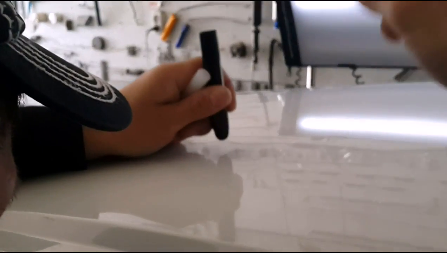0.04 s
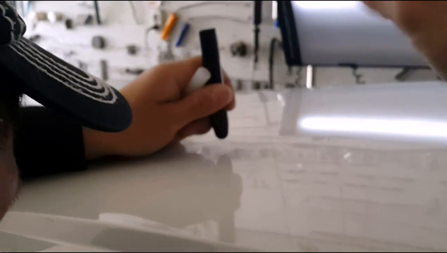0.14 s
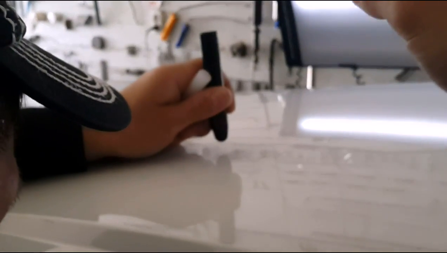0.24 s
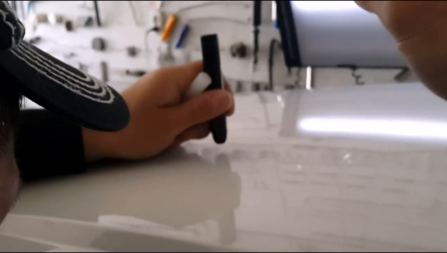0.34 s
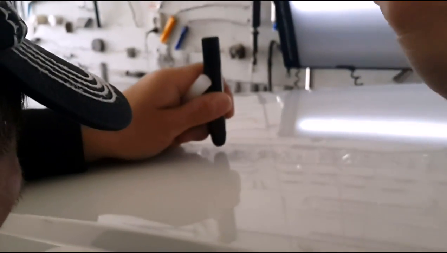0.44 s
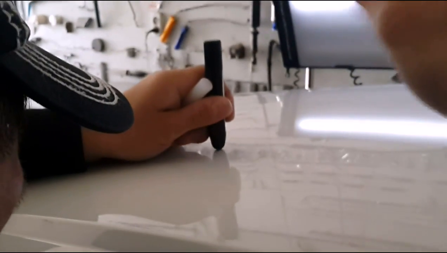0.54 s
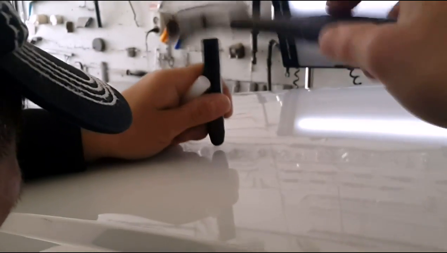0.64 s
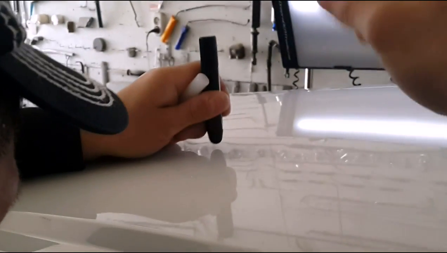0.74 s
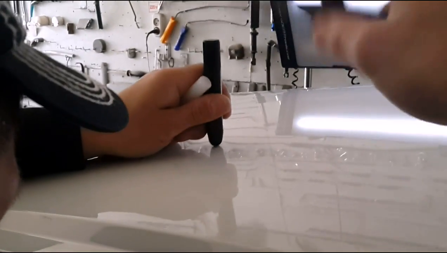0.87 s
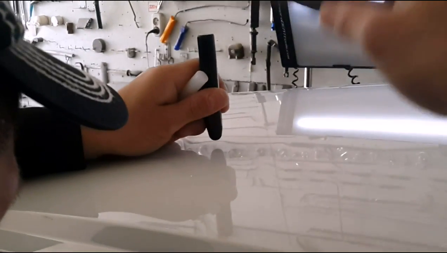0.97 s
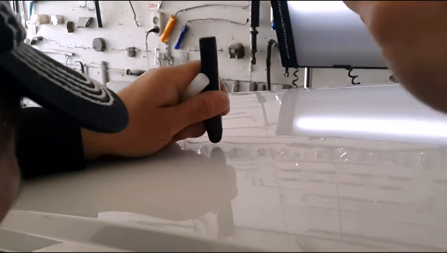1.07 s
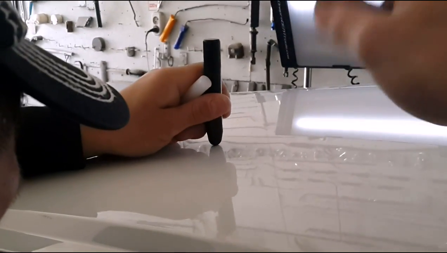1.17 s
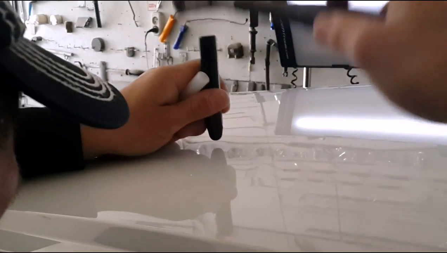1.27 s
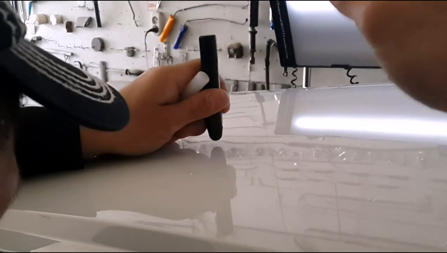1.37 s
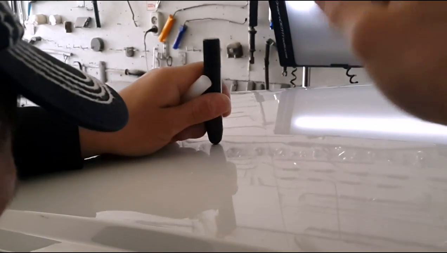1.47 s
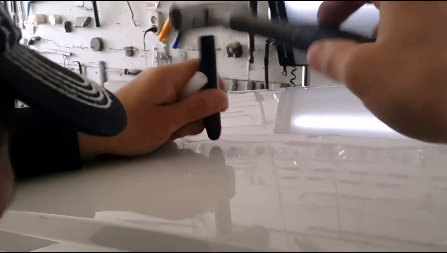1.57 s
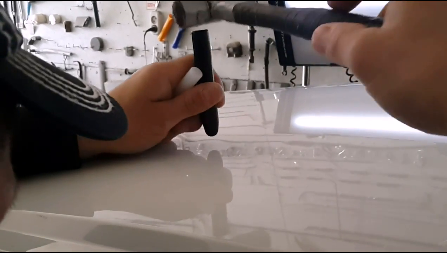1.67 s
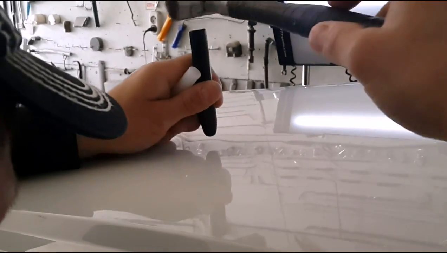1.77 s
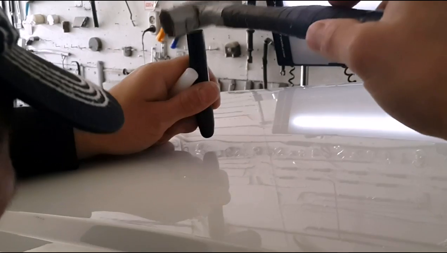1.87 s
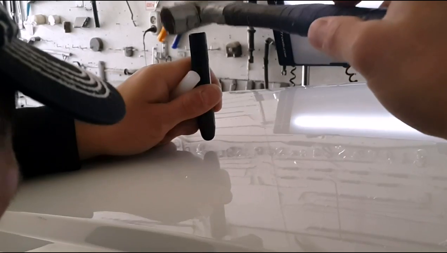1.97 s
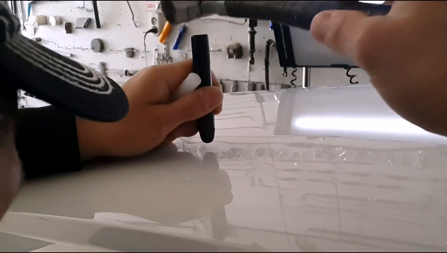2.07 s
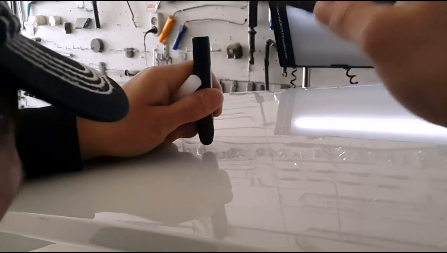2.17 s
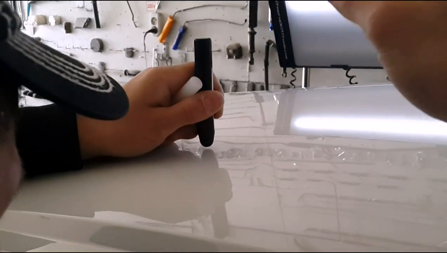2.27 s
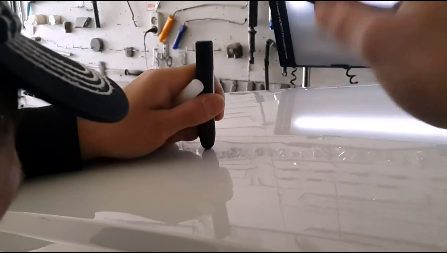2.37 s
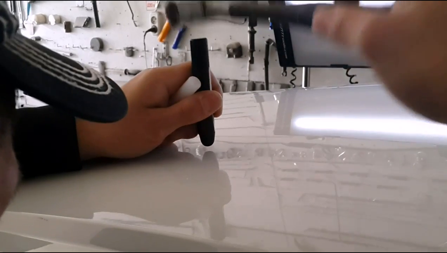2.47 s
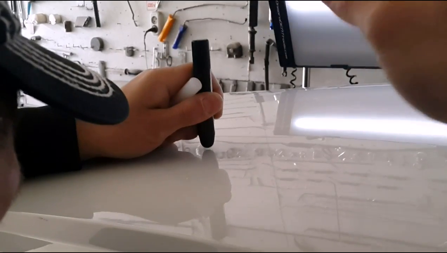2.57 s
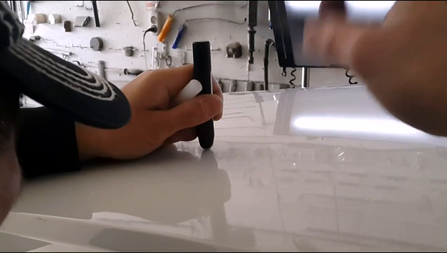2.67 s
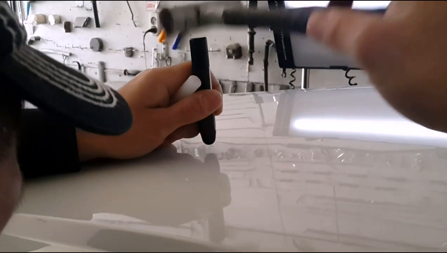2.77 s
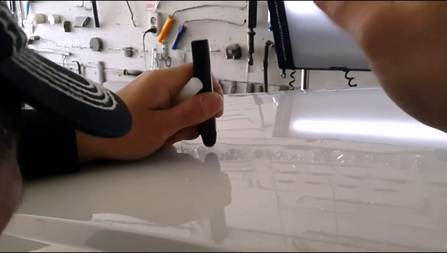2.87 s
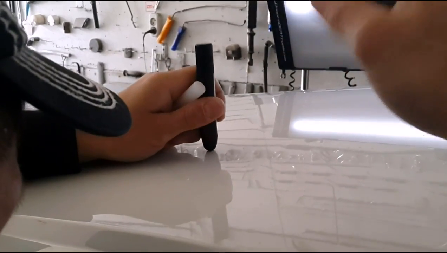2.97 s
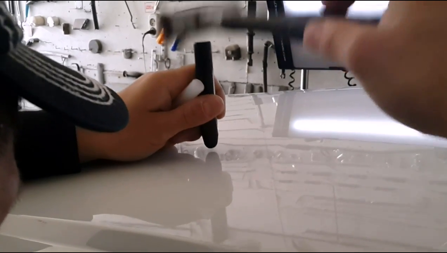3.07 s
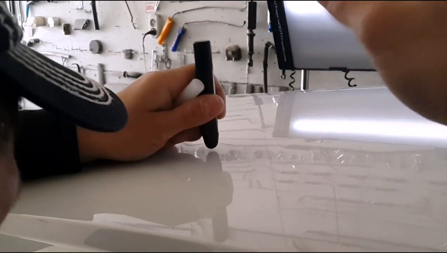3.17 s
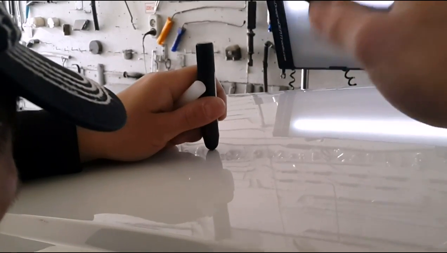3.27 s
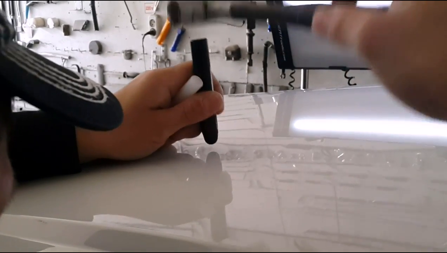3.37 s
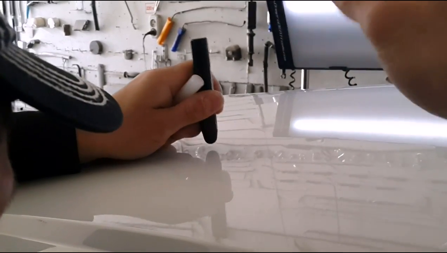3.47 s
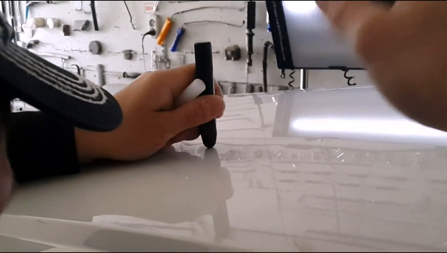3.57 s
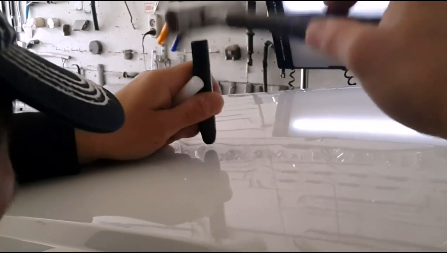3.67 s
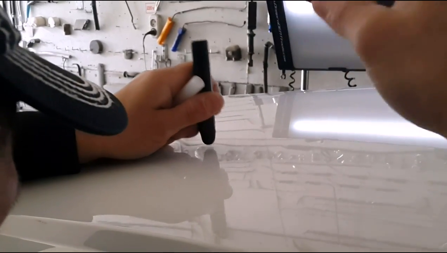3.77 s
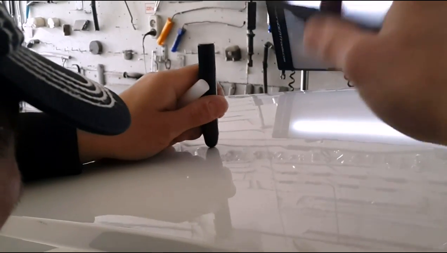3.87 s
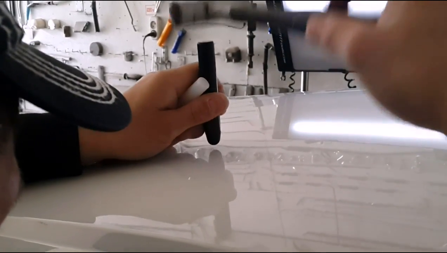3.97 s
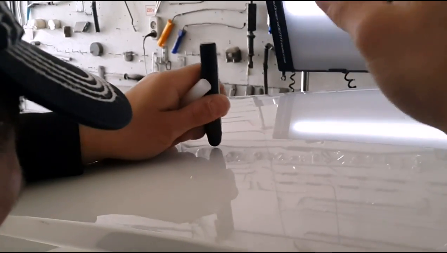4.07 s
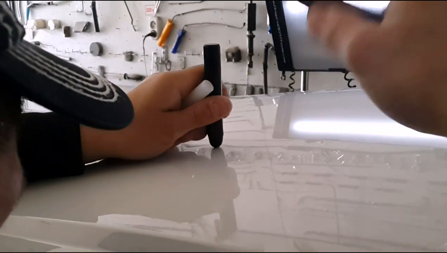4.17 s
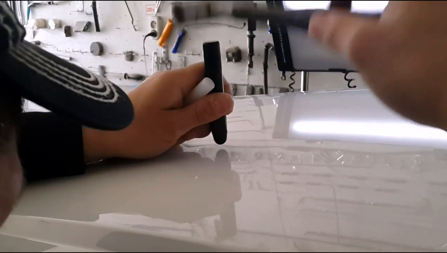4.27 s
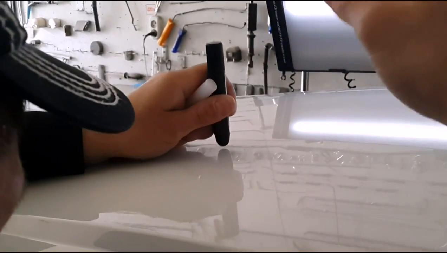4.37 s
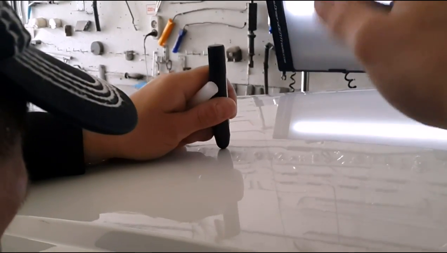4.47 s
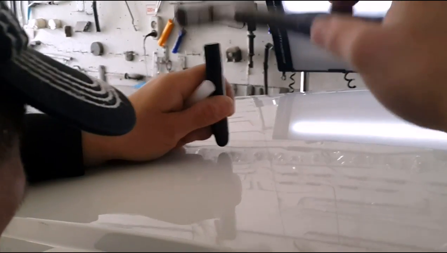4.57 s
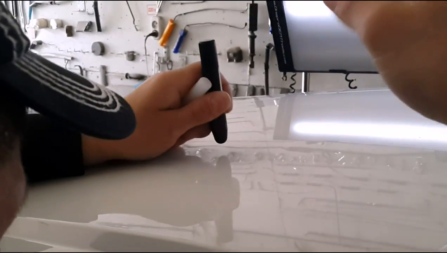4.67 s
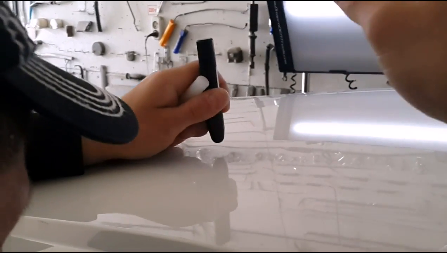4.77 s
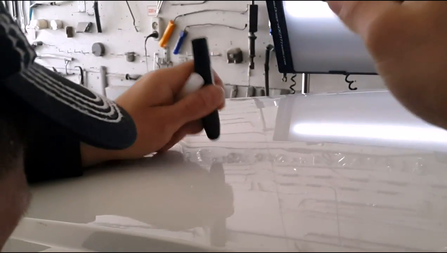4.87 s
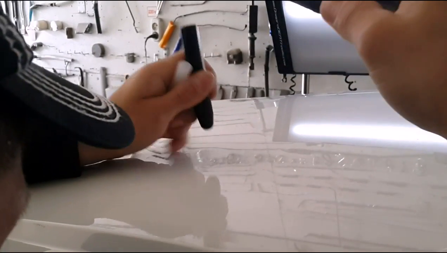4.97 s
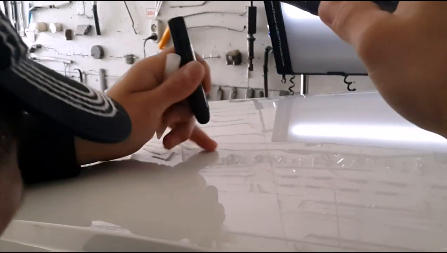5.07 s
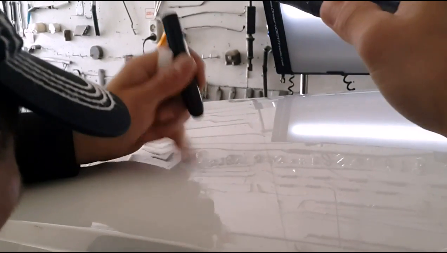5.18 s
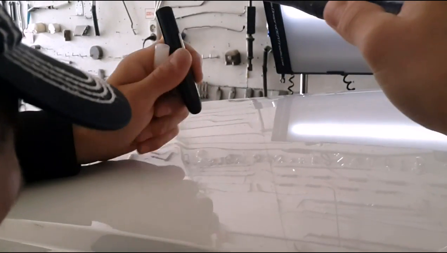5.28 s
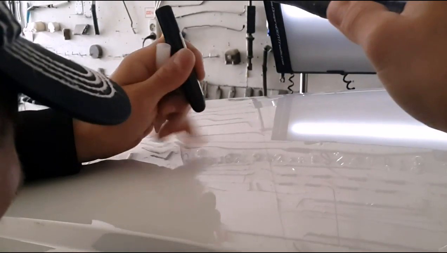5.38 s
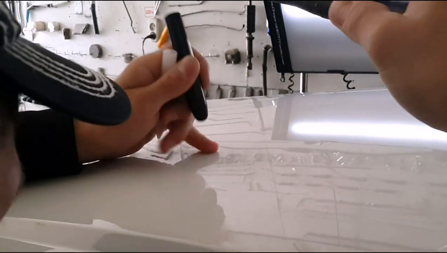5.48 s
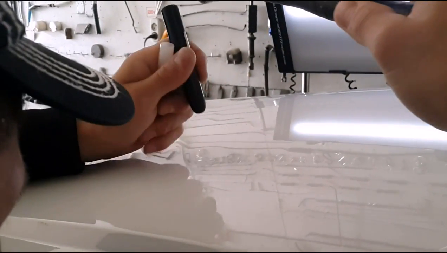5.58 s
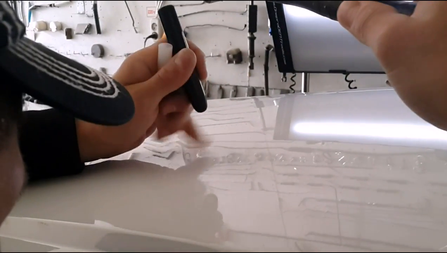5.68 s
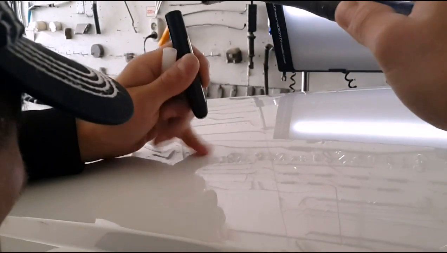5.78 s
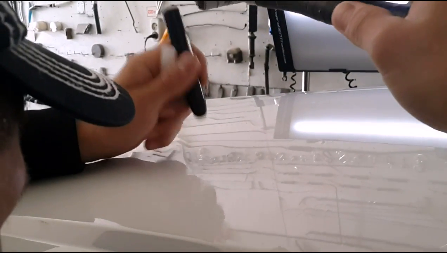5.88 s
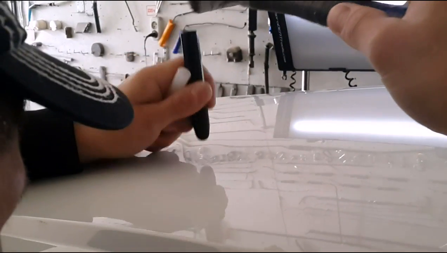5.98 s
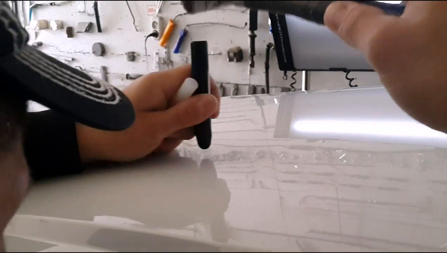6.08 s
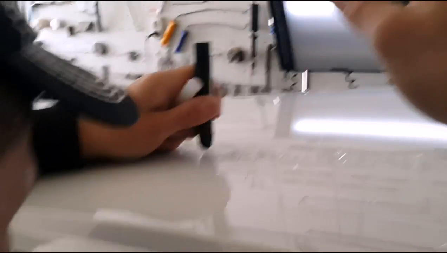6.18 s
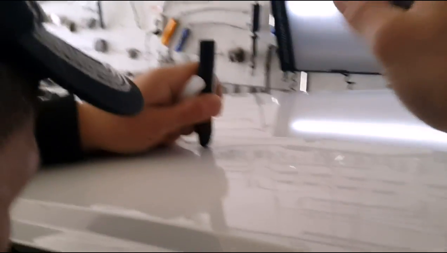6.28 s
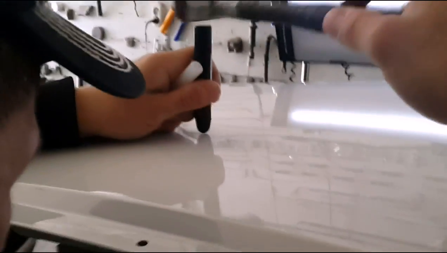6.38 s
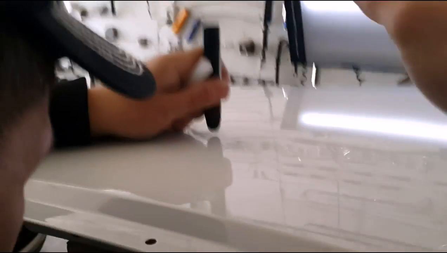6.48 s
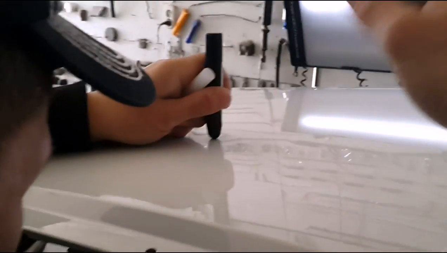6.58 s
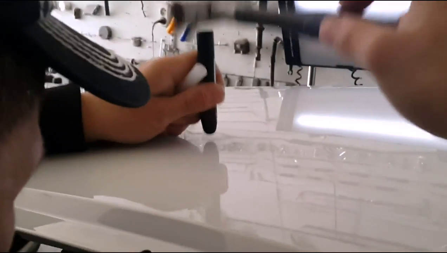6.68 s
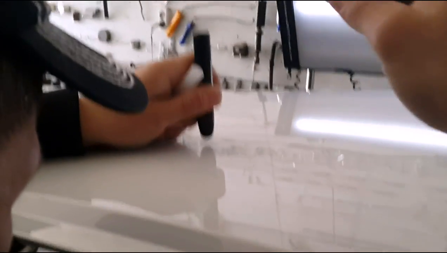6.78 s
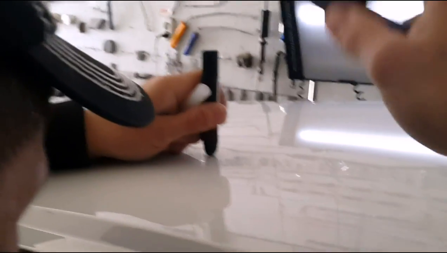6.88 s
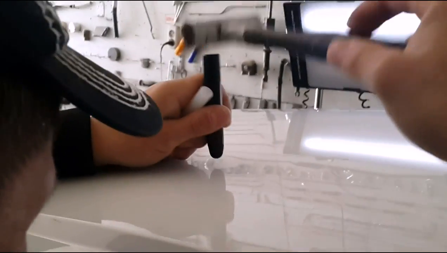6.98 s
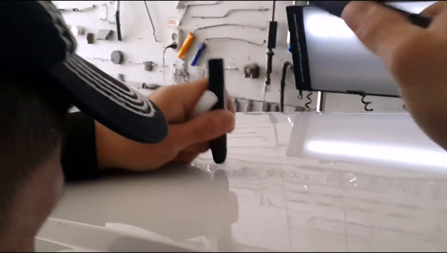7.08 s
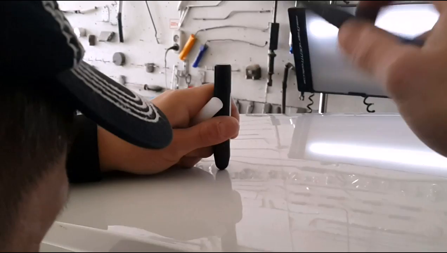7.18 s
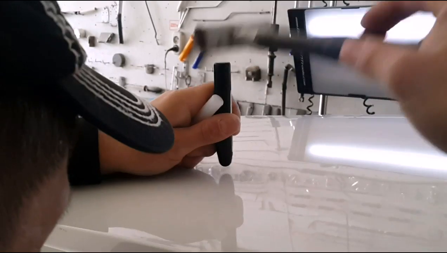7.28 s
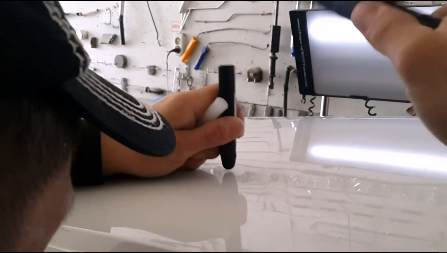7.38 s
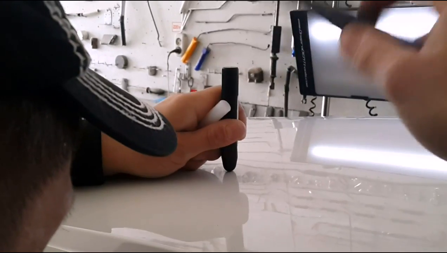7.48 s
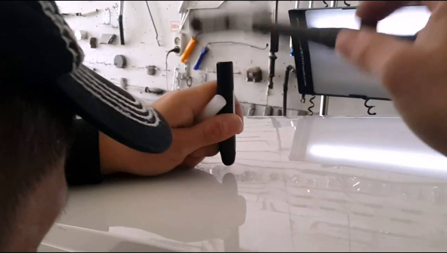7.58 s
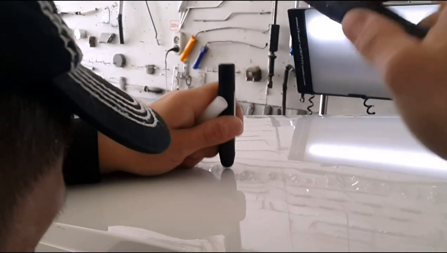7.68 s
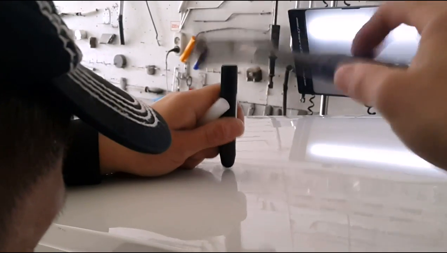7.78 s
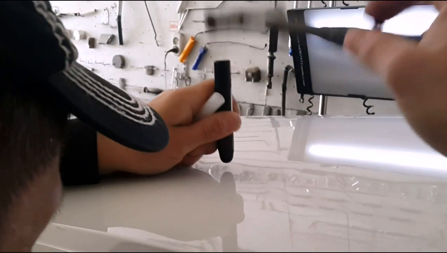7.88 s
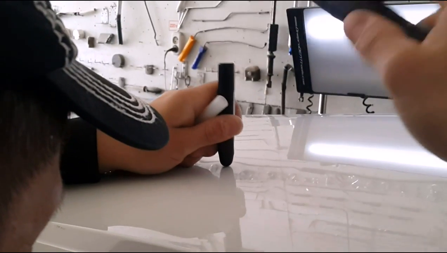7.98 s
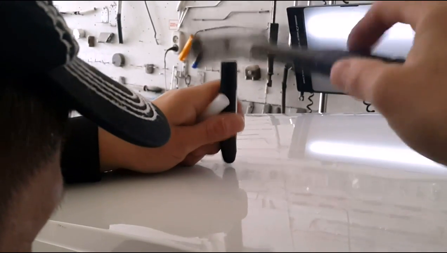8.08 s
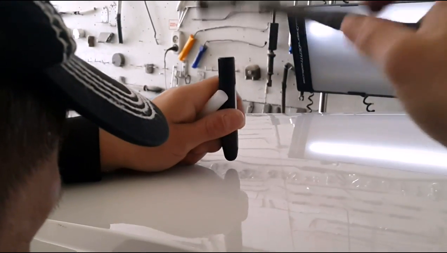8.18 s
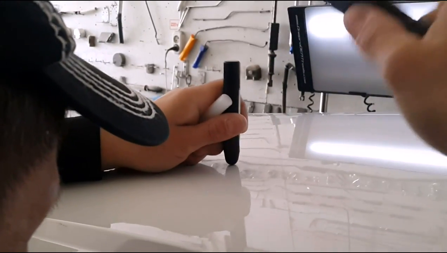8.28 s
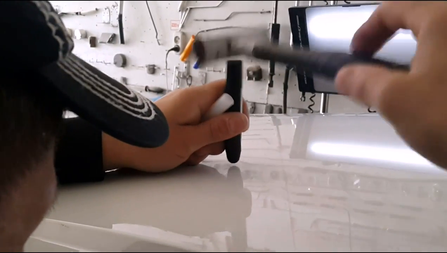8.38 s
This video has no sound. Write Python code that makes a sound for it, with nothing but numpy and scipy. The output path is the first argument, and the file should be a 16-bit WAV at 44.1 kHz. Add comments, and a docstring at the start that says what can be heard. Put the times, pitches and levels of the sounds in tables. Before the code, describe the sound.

The faint end of an earlier panel ring opens over quiet shop air. A lone hammer blow on a punch lands at 0.1 s: bright steel click, short knock, hollow sheet-metal boom and dense short room wash. Four even blows follow from 0.8 to 1.7 s, then a pause. Eight more run from 2.6 to 4.7 s, about 0.3 s apart, some crisp, others duller and glancing. Light tip ticks precede blows by under a tenth of a second. From about 5.4 s the background of airy noise and faint machine tones rises; soft low finger thuds come at 5.6 and 5.95 s, and a tiny click near 6.46 s. The hardest, dull blow hits at 6.5 s and the background drops. Six further taps, mostly crisp and somewhat lighter, continue to 8.3 s. Close stereo sound, hard walls, leaning slightly right.

```python
"""A small hammer taps a hand-held punch on a car body panel: a lone blow, then three runs, in a hard-walled workshop.
Each blow is a short contact (click, crack, punch ring) plus the sheet's sine modes and a noise wash for the room.
Just before each blow the punch tip is set down with a light tick; in the long pause a finger presses on the panel.
The shop adds filtered air noise and faint machine tones, which rise when a long quiet lets the gain climb."""
import sys
import numpy as np
from scipy import signal
from scipy.fft import rfft, irfft, next_fast_len
from scipy.io import wavfile
from scipy.ndimage import uniform_filter1d, map_coordinates

SR = 44100
rng = np.random.default_rng(int(sys.argv[2]) if len(sys.argv) > 2 else 0)


def digitize_waveform(pressure):
    """Quantize a signal to 16-bit integers and store it at the path in sys.argv[1].

    Rows of a 2-D input are taken as channels; values are limited to [-1, 1].
    """
    field = np.atleast_2d(pressure).T
    bounded = np.clip(field, -1, 1)
    quanta = np.round(bounded * 32767).astype(np.int16)
    wavfile.write(sys.argv[1], SR, quanta)


N = 372204
RING_S = np.arange(int(.8 * SR)) / SR  # time axis of every struck sound


def amp(db):
    """Decibels to gain."""
    return 10 ** (np.asarray(db) / 20)


def unit(x):
    """Scale to rms 1."""
    return x / np.sqrt(np.mean(x ** 2) + 1e-20)


def burst(x):
    """Scale a struck sound to the energy of 120 ms at rms 1."""
    energy = np.mean(np.sum(x ** 2, -1))
    return x / np.sqrt(energy / (.12 * SR))


def along(points, hz):
    """Read (Hz, value) points on a log frequency axis."""
    f, v = np.transpose(points)
    return np.interp(np.log(hz + 1), np.log(f), v)


def filtered(x, gain):
    """Multiply the spectrum of x by a gain that depends on frequency."""
    m = next_fast_len(x.shape[-1] + 8192)
    spectrum = rfft(x, m) * gain(np.fft.rfftfreq(m, 1 / SR))
    return irfft(spectrum, m)[..., :x.shape[-1]]


def coloured(x, points, size=4096):
    """Causal (minimum-phase) colour from (Hz, dB) points: nothing sounds ahead of a blow."""
    cepstrum = irfft(np.log(amp(along(points, np.fft.rfftfreq(size, 1 / SR)))))
    # fold the cepstrum forward in time
    cepstrum[1:size // 2] *= 2
    cepstrum[size // 2 + 1:] = 0
    response = irfft(np.exp(rfft(cepstrum)))
    return signal.fftconvolve(x, response[None], axes=1)[:, :x.shape[-1]]


def add(track, s, sound):
    """Mix a sound in at time s, in seconds."""
    start = max(round(s * SR), 0)
    part = track[:, start:start + sound.shape[1]]
    part += sound[:, :part.shape[1]]


# Stereo spread. Each row: frequency in Hz, side over mid in dB.
STEREO_WIDTH = [(60, -13), (130, -11), (300, -11), (550, -7), (900, -1), (2000, -1), (5000, 1), (12000, 0)]


def diffuse(count):
    """Flat stereo noise, alike at both ears in the bass and unrelated in the treble."""
    def mid_side_gain(hz):
        side_over_mid = amp(along(STEREO_WIDTH, hz))
        return np.array([np.ones_like(hz), side_over_mid]) / np.hypot(1, side_over_mid)

    mid, side = filtered(rng.standard_normal((2, count)), mid_side_gain)
    return np.array([mid + side, mid - side])


def fade(t60, hold, late_db=-20, late_ratio=2.24):
    """The level holds for a moment before it falls; a fainter, slower tail lingers."""
    early = amp(-60 * (np.hypot(RING_S, hold) - abs(hold)) / t60)
    late = amp(late_db - 60 * RING_S / (late_ratio * t60))
    return np.hypot(early, late)


# How fast panel and room die away at first. Each row: frequency in Hz, time to fall 60 dB in seconds.
DECAY_TIMES = [(80, 0.3), (220, 0.34), (370, 0.34), (650, 0.29), (1500, 0.31), (4000, 0.36), (8000, 0.32),
               (14000, 0.23)]
# Tone of the dense upper panel modes mixed by the room. Each row: frequency in Hz, relative density in dB per Hz.
WASH_TONE = [(30, -28.5), (54, -28), (70, -8), (82, -10), (98, -14), (145, -5.5), (300, -8.5), (450, -1.5),
             (620, -0.5), (850, -4.5), (1450, -6), (1850, -11.5), (2400, -10), (2800, -15), (4000, -16),
             (5600, -19.5), (7200, -21), (12500, -30), (16000, -43.5)]


def wash(hold, patchy_db=1.0, size=160):
    """Countless modes and reflections as noise, each band dying at its own speed."""
    noise = diffuse(len(RING_S))
    centres, t60s = np.transpose(DECAY_TIMES)
    tail = np.zeros_like(noise)
    for weights, t60 in zip(np.eye(len(DECAY_TIMES)), t60s):
        band = filtered(noise, lambda hz: along(np.c_[centres, weights], hz))
        tail += band * fade(t60, hold)
    spectrum, hz = rfft(tail, 2 * len(RING_S)), np.fft.rfftfreq(2 * len(RING_S), 1 / SR)
    # the low modes share the energy evenly; the high ones bunch into clusters
    power = np.mean(np.abs(spectrum) ** 2, 0)
    broad = np.sqrt(np.abs(uniform_filter1d(power, size)))
    clusters = unit(uniform_filter1d(rng.standard_normal(len(hz)), size)) * along([(1200, 0), (2000, 1)], hz)
    flat = irfft(spectrum * amp(patchy_db * clusters) / broad)[:, :len(RING_S)]
    return burst(coloured(flat, WASH_TONE))


# Strong low modes of the panel. Each row: frequency in Hz, level in dB before the tilt, build-up time in seconds.
PANEL_MODES = [(124, -9, .008), (149, -9, .008), (206, -1.5, .015), (222, -7, .01), (249, -5.5, .005),
               (264, -6, .012), (282, -8, .01), (330, -1, .03), (355, -1.5, .03), (381, -4.5, .04),
               (392, -6.5, .04), (419, -8, .02), (470, -8, .02), (493, -7, .015), (511, -6, .005),
               (554, -2, .01), (581, -7, .01), (619, -5, .02), (647, -3.5, .03), (682, -8, .008),
               (730, -7, .004), (887, -8, .005), (960, -8, .004), (1055, -6, .003), (1179, -11, .008),
               (1241, -10, .008), (1418, -8, .004), (1506, -12, .005), (1642, -13, .004), (2166, -14, .004)]


def sheet(hold, tilt_db=-5.5, waver=1.0, waver_rate=28):
    """The strong low modes of the panel as sines; reflections make each one waver."""
    ring = np.zeros((2, len(RING_S)))
    for hz, db, swell in PANEL_MODES:
        # smooth random curves from waver_rate points per second
        drift, ripple = [map_coordinates(knots, [RING_S * waver_rate], mode="mirror")
                         for knots in rng.standard_normal((2, 64))]
        # opposite phase shifts at the two ears widen the mode
        spread = np.arctan(amp(along(STEREO_WIDTH, hz))) * rng.choice([-1, 1]) * np.array([[1], [-1]])
        phase = 2 * np.pi * (hz * RING_S + rng.random()) + spread
        mode = (1 + waver * ripple) * np.sin(phase) + waver * drift * np.cos(phase)
        # the hollow modes near 350 Hz bloom a moment after the blow
        shape = fade(along(DECAY_TIMES, hz), hold) * (1 - np.exp(-RING_S / swell))
        ring += amp(db + tilt_db * np.log10(hz)) * burst(mode * shape)  # tilt in dB per decade
    return burst(ring)


def last_ring(body, ring, age=.215, level_db=-21):
    """The panel is still ringing from an earlier blow, so only the late part of its answer sounds."""
    out = np.zeros((2, N))
    add(out, 0, amp(level_db) * (body + amp(-2) * ring)[:, round(age * SR):])
    return out


# Tone of the shop air. Each row: frequency in Hz, relative density in dB per Hz.
AIR_TONE = [(30, -26.5), (70, -24.5), (98, -13), (122, -2.5), (250, -13), (400, -11.5), (650, -5),
            (1000, -11), (2000, -10.5), (3200, -18.5), (8000, -28), (13000, -26.5), (16000, -30)]
# Lines of a running machine. Each row: frequency in Hz, rms level in dB relative to SHOP_DB.
MACHINE_LINES = [(122, -19), (619, -17), (689, -16), (839.8, -10), (1028, -19), (1260, -20), (1680, -14),
                 (5997, -24)]
SHOP_DB = -69  # reference level of the background, ahead of the gain control


def shop(air_db=-1, unsteady=.5):
    """Filtered air noise and the sine lines of a machine, their phases drifting slightly."""
    t = np.arange(N) / SR
    background = amp(air_db) * unit(filtered(diffuse(N), lambda hz: amp(along(AIR_TONE, hz))))
    for hz, db in MACHINE_LINES:
        drift = np.interp(t, np.linspace(0, t[-1], 80), rng.standard_normal(80))
        phase = 2 * np.pi * hz * t + unsteady * drift + rng.uniform(-1, 1, (2, 1))
        background += amp(db) * np.sqrt(2) * np.sin(phase)
    return amp(SHOP_DB) * background


# Tone of the first crack of contact. Each row: frequency in Hz, relative density in dB per Hz.
CRACK_TONE = [(100, -11.5), (500, 2), (1000, 8), (2000, -12.5), (4000, -3.5), (7000, -8.5), (11000, -14.5),
              (16000, -30)]


def crack(t60):
    """The direct sound of the contact: a fast-decaying noise burst."""
    return burst(coloured(diffuse(len(RING_S)) * amp(-60 * RING_S / t60), CRACK_TONE))


def snap(lean_db=2):
    """Steel meets steel: a bright noise click of about a millisecond, nearer the right ear."""
    click = rng.standard_normal((2, len(RING_S))) * amp(-60 * RING_S / .005)
    bright = burst(coloured(click, [(500, 1.5), (3000, -3.0), (8000, -1), (15000, -11.5)]))
    return amp([[-lean_db], [lean_db]]) * bright


# Hammer blows, which also time the tip. Each row: start in seconds, strength in dB,
# bite in dB from 5.5 to 8 kHz (high for a square blow, low for a glancing one).
BLOWS = [(0.095, -20.5, 1.5), (0.7938, -19, 2), (1.0661, -18.5, 2), (1.384, -16.5, -0.5),
         (1.719, -17.5, 1.1), (2.584, -18.5, 2), (2.8572, -16, -11.5), (3.219, -16.5, -8),
         (3.48, -16.5, -7), (3.8105, -18.5, 1.9), (4.0783, -18, 0), (4.3903, -18.5, -3),
         (4.6992, -18.5, -8.5), (6.5142, -11, -13), (6.8125, -16.5, 2), (7.1026, -19.5, 2.5),
         (7.393, -21, 2.5), (7.694, -21, -0.5), (7.9775, -19, -8.5), (8.2754, -18.5, 1.2)]
TICK_LEAD_S, TICK_DB, TICK_BITE_DB = .073, -52, -10  # tick after a rest: lead, strength, tone from 7 kHz up
REST_S = .5  # a shorter gap between blows counts as within a run
# within a run the tip lands up to this much earlier, and on average this much harder, with random scatter
HURRY_S, HURRY_DB, HURRY_SCATTER_DB = 0.016, 4, 1.5
SKID_S, SKID_DB = 6.4642, -67  # one sharp little click as the tip settles after the long pause


def punch_tip(ring, ring_db=-9, wash_db=-3, crack_db=-11, snap_db=-19):
    """The tip touches the sheet ahead of each blow: gently after a rest, harder and less evenly within a run."""
    out = np.zeros((2, N))
    starts = np.transpose(BLOWS)[0]
    within_run = np.diff(starts, prepend=-np.inf) < REST_S
    for s, in_run in zip(starts, within_run):
        lead = TICK_LEAD_S + in_run * HURRY_S * rng.random()
        db = TICK_DB + in_run * (HURRY_DB + HURRY_SCATTER_DB * rng.standard_normal())
        tick = amp(wash_db) * wash(hold=0.0073) + amp(ring_db) * ring
        tick += amp(crack_db) * crack(t60=.025) + amp(snap_db) * snap()
        add(out, s - lead, amp(db) * coloured(tick, [(100, -3), (600, -4.0), (2000, 0.5), (7000, TICK_BITE_DB)]))
    add(out, SKID_S, amp(SKID_DB) * snap())
    return out


# Brief knock of the hand-damped punch standing on the sheet.
# Each row: frequency in Hz, average level in dB, time to fall 60 dB in seconds.
PUNCH_MODES = [(500, -10, 0.18), (716, 6.5, 0.057), (979, 2, 0.11), (1141, -2, 0.017), (1327, -8.5, 0.062),
               (1554, 5, 0.021), (2115, -10.5, 0.083), (2345, -8, 0.089), (6870, -10, 0.077),
               (8200, -8, 0.038)]


def knock(phases, scatter_db=2):
    """The punch rings briefly as damped sines, their levels a little different at each blow."""
    hz, db, t60 = np.transpose(PUNCH_MODES)[:, :, None]
    size = amp(db + scatter_db * rng.standard_normal(db.shape) - 60 * RING_S / t60)
    modes = np.sum(size * np.sin(2 * np.pi * hz * RING_S + phases), 1)
    return burst(modes * (1 - np.exp(-RING_S / .0004)))  # soft onset


def shifted(steady, fresh, corner_hz):
    """Moving the punch a little keeps the long waves and renews the short ones."""
    long_waves = filtered(steady, lambda hz: 1 / np.hypot(1, hz / corner_hz))
    short_waves = filtered(fresh, lambda hz: hz / np.hypot(corner_hz, hz))
    return long_waves + short_waves


CLANG_DB, CLANG_PER_BITE = 2.5, 0.24  # lift from 2.4 to 3.3 kHz at zero bite; its dB for each dB of bite
SPARKLE_DB, SPARKLE_PER_BITE = -0.86, 1.3  # the same from 11.5 kHz up
WALL_S, WALL_DB = .052, -7.5  # a wall throws each contact back, dulled


def hammer(body, ring, wash_db=-3, ring_db=-3.5, knock_db=-11.5, crack_db=-14, snap_db=-20, wander=.45):
    """Square blows bite in the treble, glancing ones are duller; the punch wanders, so the modes mix anew."""
    out = np.zeros((2, N))
    nearby = sheet(hold=.065)
    phases = rng.uniform(-np.pi / 2, np.pi / 2, (2, len(PUNCH_MODES), 1))
    for s, db, bite_db in BLOWS:
        contact = amp(knock_db) * knock(phases) + amp(crack_db) * crack(t60=0.071) + amp(snap_db) * snap()
        spot = wander * rng.standard_normal()
        modes = np.cos(spot) * ring + np.sin(spot) * nearby
        room = shifted(body, wash(hold=0.034), corner_hz=2980)
        blow = contact + amp(wash_db) * room + amp(ring_db) * modes
        add(blow, WALL_S, amp(WALL_DB) * coloured(contact, [(2000, -0.5), (6000, -14)]))
        clang_db = CLANG_DB + CLANG_PER_BITE * bite_db
        sparkle_db = SPARKLE_DB + SPARKLE_PER_BITE * bite_db
        colour = [(800, 0.00065), (2400, clang_db), (3300, clang_db),
                  (5500, bite_db), (8000, bite_db), (11500, sparkle_db)]
        add(out, s, amp(db) * coloured(blow, colour))
    return out


# A finger presses on the sheet. Each row: start in seconds, strength in dB, brightness in dB at 600 Hz.
FINGER_PRESSES = [(5.641, -61, -18), (5.931, -67, 0), (5.955, -70.5, 7)]


def hand(ring, rise=0.0066):
    """Soft flesh pushes the sheet with a gentle onset, a thud of panel ring and wash."""
    out = np.zeros((2, N))
    for s, db, bright_db in FINGER_PRESSES:
        thud = (wash(hold=.01) + amp(-8) * ring) * (1 - np.exp(-RING_S / rise))
        colour = [(70, -8), (130, -2.5), (250, 5.0), (600, bright_db), (6000, bright_db - 14)]
        add(out, s, amp(db) * coloured(thud, colour))
    return out


# Balance between the ears. Each row: frequency in Hz, left over right in dB.
EAR_BALANCE = [(60, -2), (250, -1.3), (550, -1.3), (1100, -4), (2200, -1.5), (4000, -1), (8000, -3)]


def scene():
    """One panel answers every contact; the whole scene leans a little to the right."""
    body = wash(hold=0.05)
    ring = sheet(hold=.065)
    mix = last_ring(body, ring) + shop() + punch_tip(ring) + hammer(body, ring) + hand(ring)
    return filtered(mix, lambda hz: amp(np.outer([.5, -.5], along(EAR_BALANCE, hz))))


# a peak over LOUD_DB resets the gain; it is held, then climbs by LIFT_DB over RECOVER_S
LOUD_DB, HOLD_S, RECOVER_S, LIFT_DB = -23.5, 0.65, 0.46, 12.5
LOOK_AHEAD_S = .008  # the gain drops this long before the peak


def gain_control(x):
    """Every loud peak pulls the gain down at once; only a long quiet lets it climb again."""
    t = np.arange(N) / SR
    coming = np.roll(np.abs(x).max(0), -round(LOOK_AHEAD_S * SR))
    last_loud_s = np.maximum.accumulate(t * (coming > amp(LOUD_DB)))
    climb = np.clip((t - last_loud_s - HOLD_S) / RECOVER_S, 0, 1)
    return x * amp(LIFT_DB * climb)


TOP_HZ = 15900  # band limit


def record(dry):
    """The recorder rides its gain, rounds off the highest peaks and cuts steeply above its band limit."""
    level = gain_control(dry)
    rounded = level / (1 + np.abs(level / .95) ** 4) ** (1 / 4)
    return filtered(rounded, lambda hz: 1 / np.sqrt(1 + (hz / TOP_HZ) ** 120))


dry = scene()
out = record(dry)
digitize_waveform(out)
```